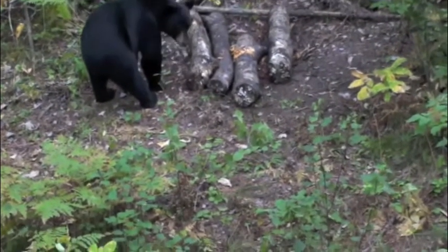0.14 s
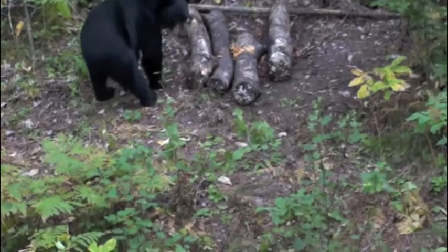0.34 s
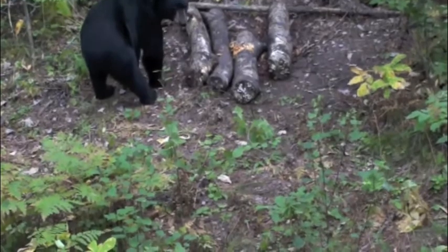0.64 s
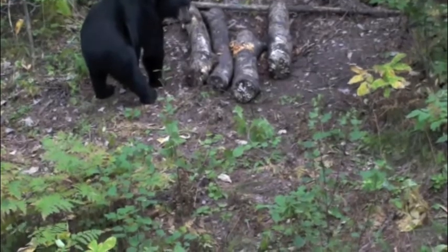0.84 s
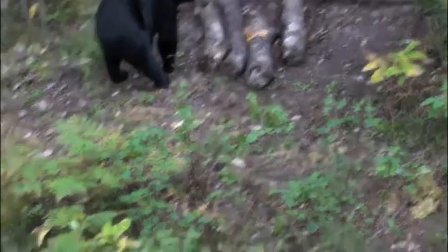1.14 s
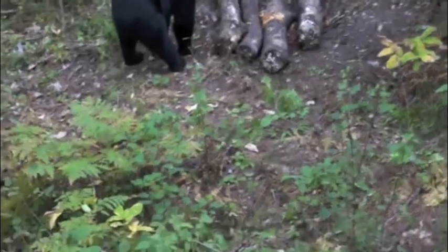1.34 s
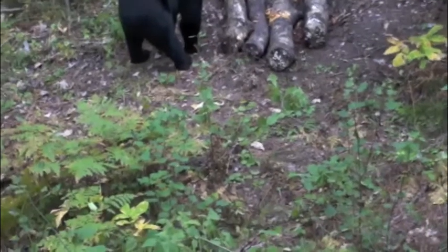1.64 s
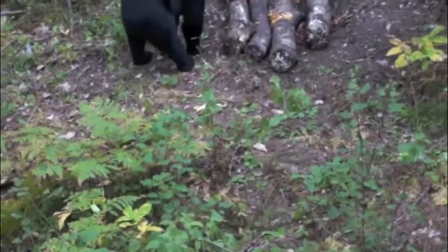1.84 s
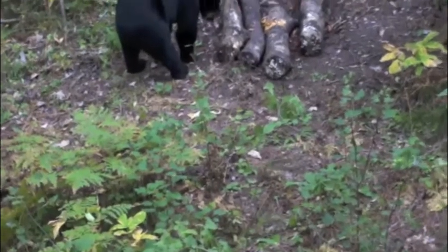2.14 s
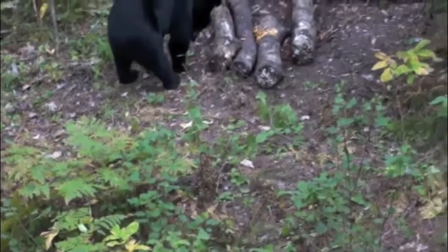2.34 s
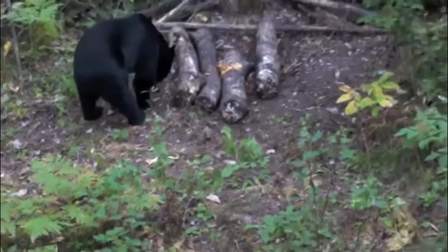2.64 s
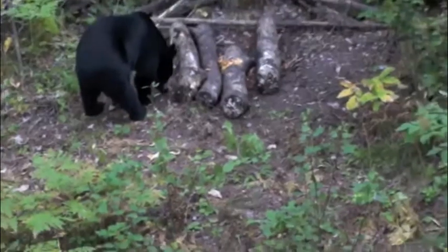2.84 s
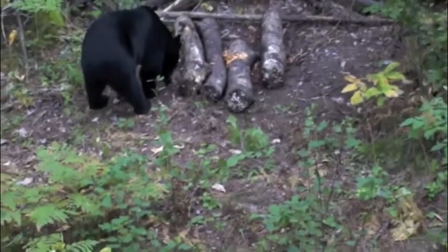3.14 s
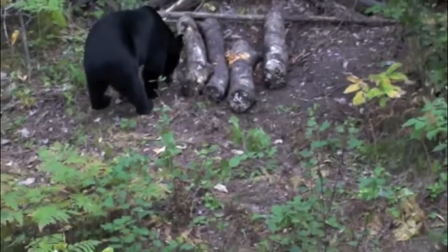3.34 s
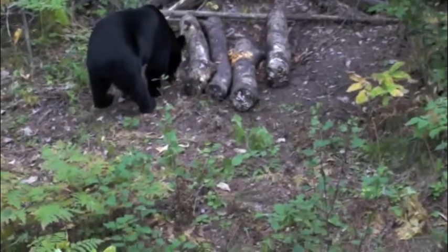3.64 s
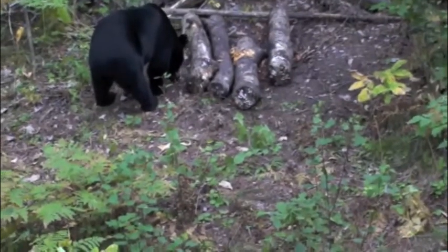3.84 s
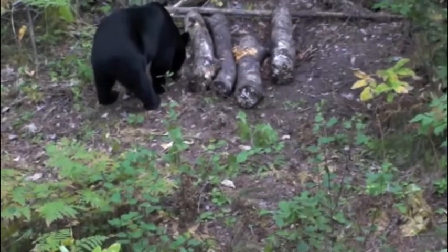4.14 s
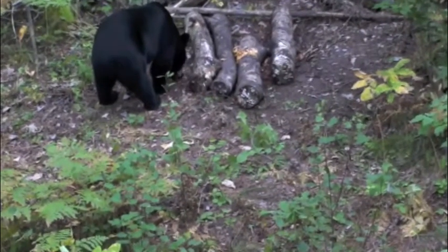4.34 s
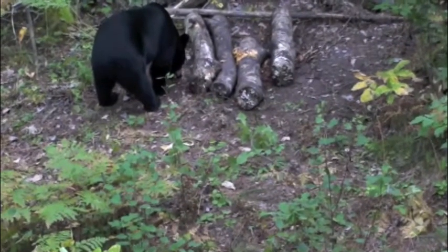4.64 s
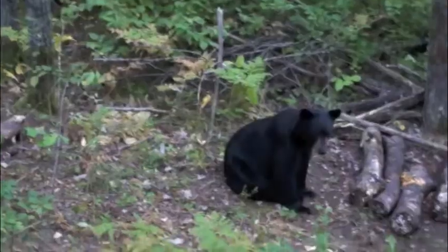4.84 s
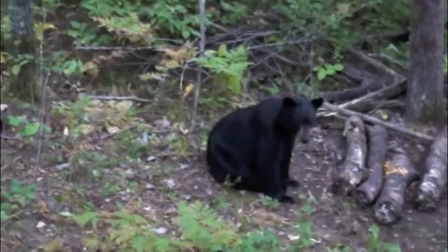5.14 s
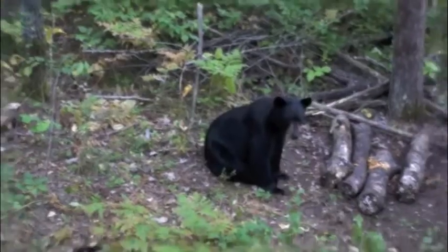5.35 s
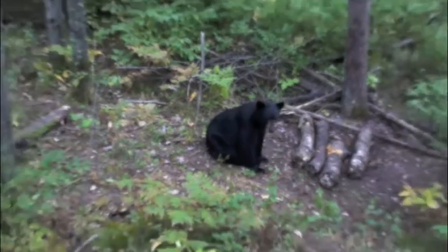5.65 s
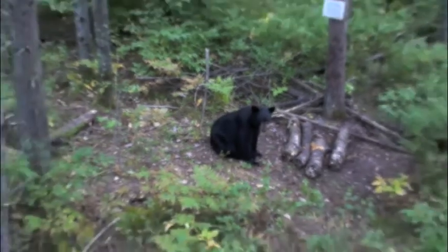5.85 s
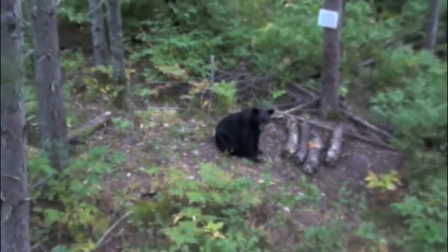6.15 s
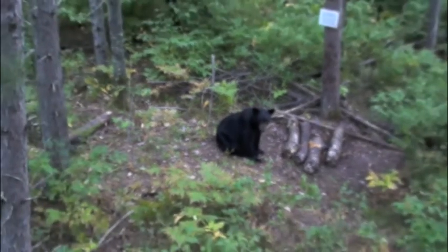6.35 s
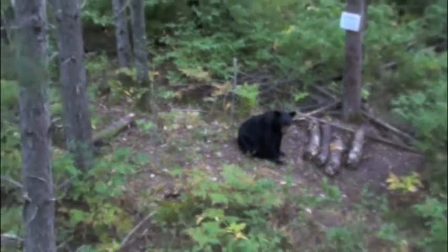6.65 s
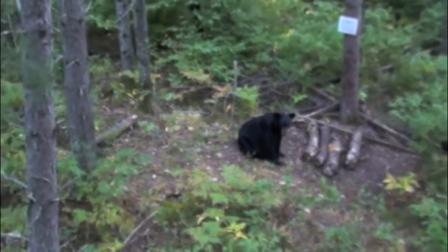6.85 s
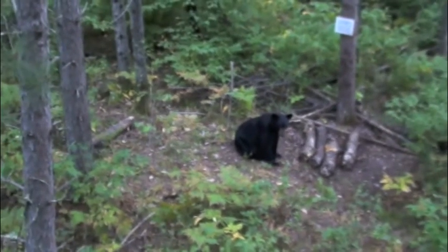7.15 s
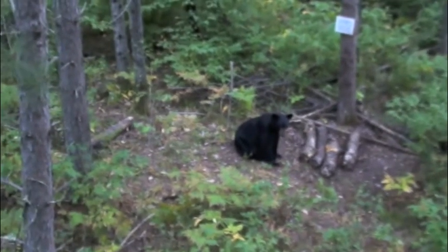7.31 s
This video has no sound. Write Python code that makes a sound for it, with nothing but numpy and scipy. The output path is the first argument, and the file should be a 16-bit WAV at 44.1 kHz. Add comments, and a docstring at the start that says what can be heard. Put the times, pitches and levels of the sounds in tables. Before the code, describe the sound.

A quiet wood heard through a handheld camera's own microphones. Steady soft hiss lies underneath. Hard plastic clicks and dull body bumps come irregularly, densest around two seconds, then finger scrapes and a sharp snap near four. The sound dips briefly to silence before five seconds and returns; afterwards only lighter rubs, hollow taps and a thin squeak remain. The bear itself is not heard.

```python
"""Quiet woods, heard through a camera held in the hand: a steady, faintly patchy noise hiss lies underneath.
The hand bumps the body (low modes and a dull rattle), and fingers slide and squeak over the plastic
(coloured slips, a wavering tone), stirring a hollow ring near 1 kHz. The case knocks (pairs of decaying
sines) and clicks (a crack with ringing plastic). Once the sound fades out and back in."""
import sys
import numpy as np
from scipy import signal
from scipy.fft import rfft, irfft
from scipy.io import wavfile
from scipy.ndimage import uniform_filter1d

SR = 44100
rng = np.random.default_rng(int(sys.argv[2]) if len(sys.argv) > 2 else 0)


def transcribe(signal):
    """Save signal, clipped to [-1, 1], as a 16-bit WAV file at the path in sys.argv[1]."""
    frames = np.atleast_2d(signal).T
    limited = np.clip(frames, -1, 1)
    pcm = np.round(limited * 32767).astype(np.int16)
    wavfile.write(sys.argv[1], SR, pcm)


N = 329868  # length in samples
HZ = np.fft.rfftfreq(N, 1 / SR)
FADE_AT, FADE_OUT, FADE_IN = 4.809, 0.12, 0.078  # moment of silence and the fades around it, in seconds


def gain_of(db):
    """Decibels to gain."""
    return 10 ** (np.asarray(db) / 20)


def evened(x):
    """Scales to rms 1."""
    return x / np.sqrt(np.mean(x ** 2) + 1e-20)


def read(points, hz):
    """Reads a curve of (Hz, value) points on a log-frequency axis."""
    f, value = np.transpose(points)
    return np.interp(np.log(hz + 1), np.log(f + 1), value)


def add(mix, s, sound):
    """Adds a sound into the mix at s seconds."""
    part = mix[round(s * SR):][:len(sound)]
    part += sound[:len(part)]


def shaped(x, db):
    """Colours a full-length signal by a gain per frequency; rms 1."""
    return evened(irfft(rfft(x) * gain_of(db), N))


def coloured(x, db):
    """Colours a short sound with a minimum-phase filter, so nothing rings before the blow."""
    log_gain = np.log(gain_of(np.maximum(db, -100)))
    circle = np.concatenate([log_gain, log_gain[-2:0:-1]])
    minimum_phase = np.exp(np.conj(signal.hilbert(circle)))[:len(db)]
    return irfft(rfft(x) * minimum_phase)


def slope_db(ratio, order):
    """A filter skirt: flat while the ratio is under 1, falling above."""
    return -10 * np.log10(1 + ratio ** (2 * order))


def lorentz(hz, width):
    """The bell of a resonance over the full spectrum: 1 at its centre, 1/2 at half a width away."""
    return 1 / (1 + (2 * (HZ - hz) / width) ** 2)


def peaked(x, size):
    """Scales a sound so that its loudest stretch of `size` samples has the rms of a sine of amplitude 1."""
    return x / np.sqrt(2 * uniform_filter1d(x ** 2, size).max())


def burst(envelope):
    """A rattle of random fine shape with a flattened spectrum, dying under a bent copy of the envelope."""
    spectrum = rfft(rng.standard_normal(len(envelope)) * envelope)
    return irfft(spectrum / (abs(spectrum) + 1e-12)) * envelope ** (1 / 4)


# Spectrum of the hiss. Each row: frequency in Hz, relative level in dB per Hz.
HISS_COLOUR = [(15, -55), (25, -16.5), (217, -2.5), (285, -3.5), (309, -1), (344, -2.5), (394, -1),
               (439, -4.5), (659, -4.5), (1230, -7), (1520, -9), (7510, -7), (11000, -17.5), (14800, -19),
               (16000, -19)]
# How alike the hiss is in both ears. Each row: frequency in Hz, left-right correlation (1 is identical).
EAR_LIKENESS = [(60, 0.95), (150, 0.93), (380, 0.7), (950, 0.33), (2380, 0.64), (5980, 0.97), (15000, 1)]
HISS_DB, HISS_AFTER_FADE_DB = -50.5, -51.5  # rms level before and after the moment of silence


def hiss(patchy_db=1.15):
    """Steady air and microphone hiss: noise per time-frequency cell, faintly patchy, partly shared by the ears."""
    hz = np.fft.rfftfreq(1024, 1 / SR)
    a, b, c, d, patches = rng.standard_normal((5, N // 256 + 5, len(hz)))
    patches = uniform_filter1d(patches, size=12, axis=0)
    patches = evened(uniform_filter1d(patches, size=12, axis=1))
    same = np.clip(read(EAR_LIKENESS, hz), -1, 1)
    left = a + 1j * b
    right = same * left + np.sqrt(1 - same ** 2) * (c + 1j * d)
    cells = np.array([left, right]) * gain_of(read(HISS_COLOUR, hz) + patchy_db * patches)
    noise = signal.istft(cells, nperseg=1024, noverlap=768, time_axis=1, freq_axis=2)[1][:, :N]
    level_db = np.where(np.arange(N) / SR < FADE_AT, HISS_DB, HISS_AFTER_FADE_DB)
    return evened(noise) * gain_of(level_db)


# Blows of the hand. Each row: start in seconds, peak level in dB before the trim, lowest pitch in Hz,
# highest pitch in Hz, t60 of the ring in seconds.
BUMPS = [(0.283, -27.5, 199, 700, 0.053), (.296, -34.5, 89, 600, 0.36), (1.398, -46, 60, 250, 0.06),
         (1.65, -44.5, 70, 700, .2), (1.761, -40.5, 90, 250, 0.04), (2.068, -45, 60, 200, 0.15),
         (2.218, -42.5, 60, 350, 0.034), (2.475, -19.5, 90, 296, 0.034), (2.4799, -20, 150, 400, 0.055),
         (2.491, -16, 79.6, 249, 0.059), (2.505, -27.5, 45, 620, 0.2), (2.553, -33, 110, 700, 0.009),
         (3.159, -41, 90, 300, 0.14), (3.447, -37, 250, 800, 0.22), (3.515, -40.5, 100, 600, 0.026),
         (3.547, -35, 200, 700, 0.028), (4.099, -37, 304, 710, 0.064), (4.569, -36, 140, 850, 0.028),
         (4.704, -37, 60, 140, 0.13)]
# Low resonances of the camera body. Each row: frequency in Hz before detuning, relative level in dB.
BODY_MODES = [(112, 2), (190, -2.5), (275, 0), (406, -3), (536, -4), (697, -3)]
# Colour of the shaken body, for rattle and rumble. Each row: frequency in Hz, relative level in dB.
BODY_COLOUR = [(25, -52), (60, -5), (115, 0.5), (190, -2.5), (270, 0), (340, -3), (600, -0.5), (1200, 0),
               (4000, -7), (14000, -27)]


def bumps(rise_s=0.00059, leak_db=-28, trim_db=-2):
    """Soft blows shake the whole camera: its low modes shudder and its parts rattle dully."""
    t, hz = np.arange(16384) / SR, np.fft.rfftfreq(16384, 1 / SR) + 1
    out = np.zeros(N)
    for s, db, low_hz, top_hz, t60 in BUMPS:
        dying = np.exp(-np.log(1000) * t / t60)
        # the grip detunes the modes a little from blow to blow
        detune = 1 + 0.02 * rng.standard_normal(len(BODY_MODES))
        ring = np.zeros(len(t))
        for k, (mode_hz, mode_db) in enumerate(BODY_MODES):
            sign = (-1) ** k  # neighbouring modes start in opposite directions
            ring += sign * gain_of(mode_db) * np.sin(2 * np.pi * mode_hz * detune[k] * t)
        rattle = coloured(burst(dying), read(BODY_COLOUR, hz))
        shake = (evened(ring * dying) + evened(rattle)) * (1 - np.exp(-t / rise_s))
        # the upper skirt levels out, so a little brightness leaks through
        skirts_db = slope_db(low_hz / hz, order=2) + np.maximum(slope_db(hz / top_hz, order=2), leak_db)
        add(out, s, gain_of(db + trim_db) * peaked(coloured(shake, skirts_db), size=220))
    return out


PRESS_CURVE, LIFT_CURVE = 0.96, 1.36  # powers that bend the attack and the release of every finger move


def pressure(start, attack_s, hold_s, release_s):
    """A finger presses on, slides steadily and lifts off: a gain from 0 to 1 per sample."""
    t = np.arange(N) / SR - start
    press = np.clip(t / attack_s, 0, 1) ** PRESS_CURVE
    lift = np.clip(1 - (t - attack_s - hold_s) / release_s, 0, 1) ** LIFT_CURVE
    return press * lift


# Squeaks of a finger. Each row: start, attack, hold and release in seconds, rms level in dB at full pressure.
SQUEAKS = [(5.917, .008, .115, .015, -52), (6.66, .035, .022, .012, -38)]
SQUEAK_HZ = 1040  # centre pitch, set by the hollow of the case


def squeaks(waver=0.025, flutter_db=2.5):
    """A finger sticks and slips in step with the hollow of the case: a thin, wavering tone."""
    wander = uniform_filter1d(rng.standard_normal((2, N)), size=300, axis=1)
    wander = uniform_filter1d(wander, size=200, axis=1)
    drift, grip = evened(wander[0]), evened(wander[1])
    phase = 2 * np.pi * np.cumsum(SQUEAK_HZ * (1 + waver * drift)) / SR
    tone = np.sin(phase) * gain_of(flutter_db * grip)
    return evened(tone) * sum(gain_of(db) * pressure(*timing) for *timing, db in SQUEAKS)


def slips(per_s=1500, smooth=0.15, chatter_db=2.1):
    """Skin on plastic: tiny equal slips either way over fine noise, flickering as the finger catches and gives."""
    ticks = rng.choice([-1, 1], N) * (rng.random(N) < per_s / SR)
    chatter = evened(uniform_filter1d(rng.standard_normal(N), size=180))
    return (ticks + smooth * rng.standard_normal(N)) * gain_of(chatter_db * chatter)


# Finger strokes. Each row: start, attack, hold and release in seconds, then the levels of scrape,
# hollow ring and body rumble in dB before their trims.
STROKES = [(1.137, 0.067, .075, 0.03, -67, -70, -52), (3.13, 0.089, 0.029, .07, -48.5, -54, -51),
           (3.259, 0.053, 0.16, 0.065, -47, -56.5, -57.5), (3.618, 0.37, .06, .06, -51, -54.5, -53.5),
           (4.103, 0.03, 0.028, 0.062, -46, -62, -53.5), (4.853, 0.056, .025, 0.067, -60, -58.5, -61),
           (5.916, .008, 0.12, .02, -60, -58, -74), (6.151, .015, 0.017, 0.026, -56, -55.5, -67),
           (6.498, 0.022, 0.0081, 0.069, -36.5, -42, -49), (6.607, .03, .02, .02, -49.5, -52, -58),
           (6.66, 0.033, 0.015, 0.022, -41.5, -41, -59.5), (6.885, 0.064, 0.027, .04, -54.5, -54.5, -76),
           (7.08, .015, 0.079, 0.044, -50.5, -54, -66), (7.239, 0.028, .02, .04, -50.5, -60, -65),
           (7.3, 0.018, 0.061, 0.058, -54, -56, -68)]
# Colour of the scraped surface. Each row: frequency in Hz, relative level in dB per Hz.
SCRAPE_COLOUR = [(200, -37), (330, 0.5), (600, -23), (1200, -5.5), (2500, -1.5), (4500, 1), (8500, -2.5),
                 (10000, -13), (14000, -42)]
# Bands that a scrape brings out. Each row: frequency in Hz, width in Hz, boost in dB.
SCRAPE_BANDS = [(2000, 450, 7), (3350, 650, 8), (5950, 900, 8)]
# Resonances of the hollow case. Each row: frequency in Hz, width in Hz, relative level in dB.
HOLLOW = [(1024, 113, 0.5), (1220, 160, -10.5), (1880, 690, -18.5)]
# Colour of the brighter swish. Each row: frequency in Hz, relative level in dB.
SWISH_COLOUR = [(300, -14), (1000, -19), (3000, -2), (7000, 8), (10500, 2.5), (13500, -11), (16000, -22)]
# One brighter swish: start, attack, hold and release in seconds, and its level in dB.
SWISH, SWISH_DB = (3.34, 0.051, 0.047, 0.064), -44


def strokes(rumble_top_hz=650, rumble_low_hz=80, scrape_trim_db=-1, ring_trim_db=-2.5, rumble_trim_db=-1):
    """Sliding fingers scrape the surface, sing in the hollow and rumble in the body, all from the same slips."""
    scrape, ring, rumble = sum(np.outer(gain_of(levels_db), pressure(*timing))
                               for *timing, levels_db in [(*row[:4], row[4:]) for row in STROKES])
    drive = slips()
    bands_db = sum(db * lorentz(hz, width) for hz, width, db in SCRAPE_BANDS)
    surface = scrape * shaped(drive, read(SCRAPE_COLOUR, HZ) + bands_db)
    resonance = sum(gain_of(db) * lorentz(hz, width) for hz, width, db in HOLLOW)
    hollow = ring * shaped(drive, 20 * np.log10(resonance))
    skirts_db = slope_db(HZ / rumble_top_hz, order=3) + slope_db(rumble_low_hz / (HZ + 1), order=1)
    body = rumble * shaped(drive, read(BODY_COLOUR, HZ) + skirts_db)
    # a quick slide is smooth: plain noise instead of slips
    smooth_slide = shaped(rng.standard_normal(N), read(SWISH_COLOUR, HZ))
    swish = gain_of(SWISH_DB) * pressure(*SWISH) * smooth_slide
    trimmed = gain_of(scrape_trim_db) * surface + gain_of(ring_trim_db) * hollow + gain_of(rumble_trim_db) * body
    return trimmed + swish


# Hollow knocks. Each row: start in seconds, peak level in dB before the trim, pitch in Hz, t60 in seconds.
KNOCKS = [(0.141, -45, 1260, 0.083), (1.2055, -46, 1030, 0.025), (1.766, -34, 1014, 0.015),
          (1.838, -27, 1160, 0.013), (2.002, -36.5, 1040, 0.012), (2.482, -26, 950, .025),
          (2.4915, -12, 920, 0.01), (3.2, -27, 1020, 0.024), (3.2083, -22, 950, 0.066),
          (4.2861, -32, 940, 0.034), (4.287, -35, 1270, 0.043), (4.567, -39, 936, 0.055),
          (6.034, -40.5, 1024, 0.031), (6.495, -35, 1070, 0.022), (6.665, -33.5, 1023, 0.04),
          (6.711, -30.5, 1018, 0.045), (7.093, -38, 1040, .045)]


def knocks(rise_s=0.0011, upper_ratio=1.17, upper_db=-10, trim_db=-2):
    """A fingertip catches and lets go; the hollow of the case rings with a close pair of modes."""
    t, out = np.arange(SR // 8) / SR, np.zeros(N)
    for s, db, hz, t60 in KNOCKS:
        lower = np.sin(2 * np.pi * hz * t)
        upper = gain_of(upper_db) * np.sin(2 * np.pi * hz * upper_ratio * t)
        knock = (lower + upper) * (1 - np.exp(-t / rise_s)) * np.exp(-np.log(1000) * t / t60)
        add(out, s, gain_of(db + trim_db) * peaked(knock, size=88))
    return out


# Sharp clicks of the case. Each row: start in seconds, peak level in dB before the trim,
# tilt in dB per octave, lowest pitch in Hz, time constant of the crack's envelope in seconds.
CLICKS = [(0.1285, -11, -1.5, 1610, 0.00066), (.2905, -36.5, -4.5, 1200, 0.0015),
          (1.2692, -30.5, 1, 1500, 0.0028), (1.3160, -39, -2, 1000, 0.00095),
          (1.331, -34.5, -2.5, 1410, 0.0014), (1.646, -40.5, -7, 900, 0.0052),
          (1.677, -40.5, -4, 900, 0.0038), (1.7667, -35, 3.5, 900, 0.0039),
          (1.8512, -24.5, -4, 1200, 0.0018), (1.8557, -24, -1, 1200, .0009),
          (1.8625, -12, -1.5, 1210, 0.0013), (1.9563, -15.5, 7, 3980, 0.0013), (2.0011, -37, -7, 900, .001),
          (2.032, -27, -1, 2500, 0.0029), (2.0407, -11, 0, 1400, 0.0013), (2.376, -27.5, -.5, 1800, 0.0016),
          (2.3878, -33, -3.5, 2010, .0019), (2.491, -19, -4.5, 3000, 0.0017),
          (2.4986, -11, 0, 1380, 0.0021), (2.9077, -31, -0.5, 2230, .0017),
          (3.148, -32.5, -4.5, 700, 0.0035), (3.1607, -32.5, -8, 900, .0012),
          (3.1990, -26.5, -5, 3000, 0.004), (3.2067, -25.5, -2, 930, 0.0023),
          (3.4812, -31.5, 0.5, 900, 0.00097), (3.549, -37, 2, 600, 0.0016),
          (4.0282, -19.5, -5.5, 3000, 0.001), (4.0318, -8, -3, 1920, 0.00093),
          (4.283, -20, -0.5, 705, .0021), (4.9913, -41, -13, 1400, .001), (5.3204, -36.5, -2, 1500, .0015),
          (6.0170, -38, -1, 2000, .001), (6.4938, -39, -6, 900, 0.0009), (6.6355, -38, 4, 895, 0.0011),
          (6.665, -36, 3, 895, 0.0012)]
# What the plastic rings with. Each row: frequency in Hz, width in Hz, level in dB before scaling by the width.
CASE_MODES = [(1090, 110, -16.5), (1758, 98, -1.5), (2480, 124, -1), (2980, 93, -3), (3580, 370, -7.5),
              (3880, 560, -1), (5306, 330, 3.5), (6850, 250, -18), (8420, 1700, -1), (8930, 530, -4.5),
              (11500, 500, -26), (12900, 600, -24.5)]


def clicks(crack_db=-6, longer_db=4, crack_top_hz=10000, soft_duller=0.018,
           tail_db=-30, tail_s=0.012, tail_top_hz=4500, rise_s=0.0006, trim_db=-1):
    """A seam of the case slips: a brief crack, and the plastic rings for a few milliseconds."""
    t, hz = np.arange(4096) / SR, np.fft.rfftfreq(4096, 1 / SR) + 1
    out = np.zeros(N)
    for s, db, tilt, low_hz, crack_s in CLICKS:
        ring = np.zeros(len(t))
        for mode_hz, width, mode_db in CASE_MODES:
            dying = np.exp(-np.pi * width * t)
            ring += gain_of(mode_db) * width * dying * np.sin(2 * np.pi * (mode_hz * t + rng.random()))
        top_hz = crack_top_hz * 2 ** (soft_duller * (db + 8.5))  # gentle slips are duller
        crack = coloured(burst(np.exp(-t / crack_s)), slope_db(hz / top_hz, order=4))
        tail = rng.standard_normal(len(t)) * np.exp(-t / tail_s)
        tail = coloured(tail, slope_db(hz / tail_top_hz, order=2))
        # a quick slip lets the modes ring clear; a longer one has more crackle, in dB per doubling
        crack_gain = gain_of(crack_db + longer_db * np.log2(crack_s / 0.00088))
        click = peaked(ring, size=44) + crack_gain * peaked(crack, size=44) + gain_of(tail_db) * peaked(tail, size=44)
        tilt_db = tilt * np.log2(hz / 4000) + slope_db(low_hz / hz, order=3)
        click = coloured(click * (1 - np.exp(-t / rise_s)), tilt_db)
        add(out, s, gain_of(db + trim_db) * peaked(click, size=44))
    return out


# How unlike the two microphones pick up sound in the case. Each row: frequency in Hz,
# side-to-mid level in dB before the ripple of the detour.
UNLIKE = [(60, -28), (130, -24), (270, -13.5), (1000, -10), (2200, -9.5), (5000, -14), (8500, -14),
          (13000, -21)]


def ports(x, detour_s=0.00194, scatter=0.25):
    """The case carries a sound to its two microphones by different paths: a phase shift and a short detour."""
    detour = scatter * np.exp(-2j * np.pi * HZ * detour_s)
    transfer = (1j + detour) / np.hypot(1, scatter)
    side = irfft(rfft(x) * transfer * gain_of(read(UNLIKE, HZ)), N)
    return np.array([x + side, x - side])


def scene():
    """Handling sounds, carried through the case, over the hiss."""
    handling = bumps() + squeaks() + strokes() + knocks() + clicks()
    return hiss() + ports(handling)


def record(dry, edge_hz=16000):
    """A brief fade to silence and back; then a low-pass at the band edge."""
    t = np.arange(N) / SR - FADE_AT
    fade = np.clip(np.maximum(-t / FADE_OUT, t / FADE_IN), 0, 1)
    low_pass = signal.firwin(255, edge_hz, window=("kaiser", 9), fs=SR)
    return signal.oaconvolve(dry * fade, low_pass[None], "same")


dry = scene()
out = record(dry)
transcribe(out)
```